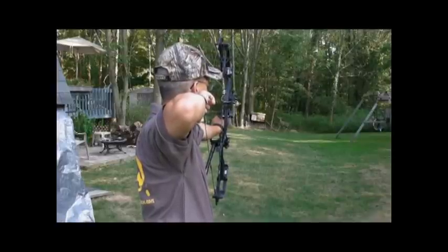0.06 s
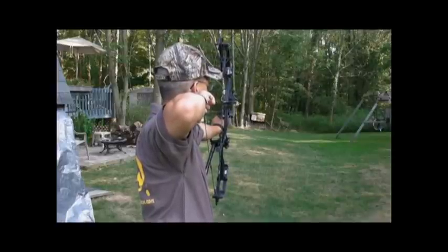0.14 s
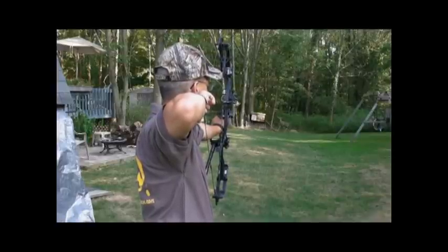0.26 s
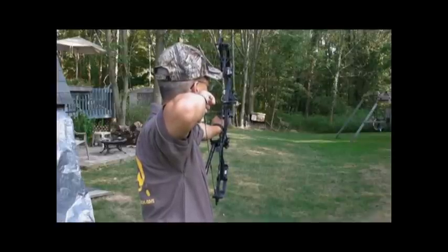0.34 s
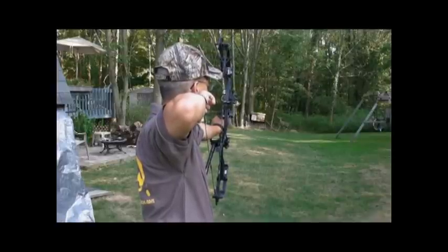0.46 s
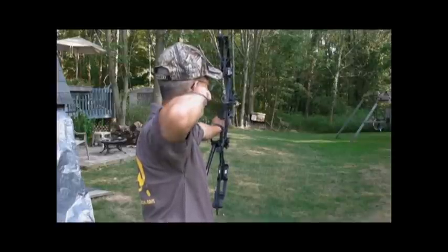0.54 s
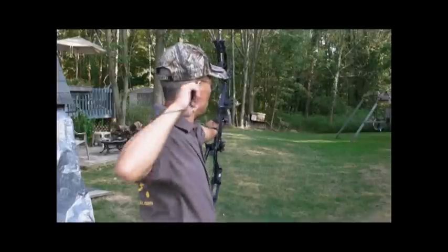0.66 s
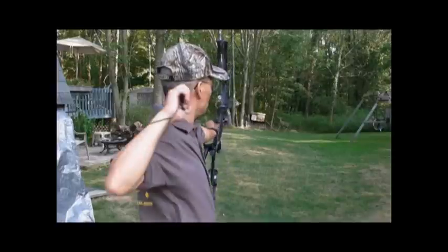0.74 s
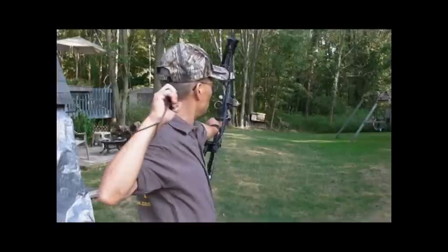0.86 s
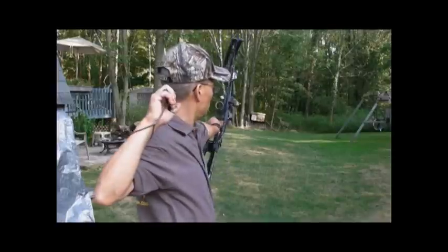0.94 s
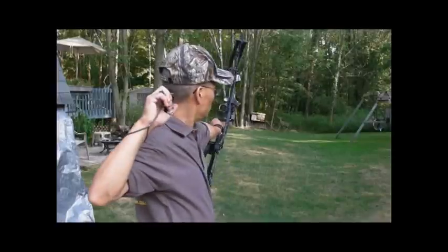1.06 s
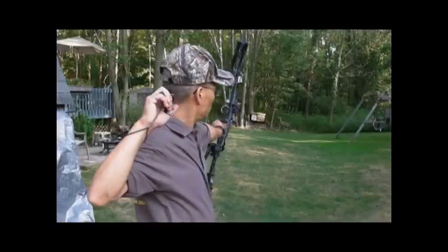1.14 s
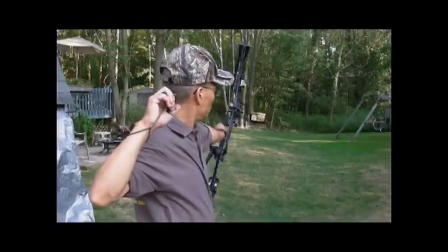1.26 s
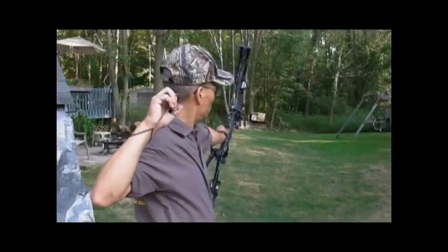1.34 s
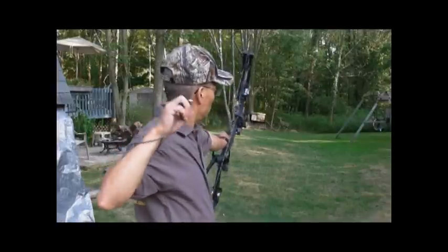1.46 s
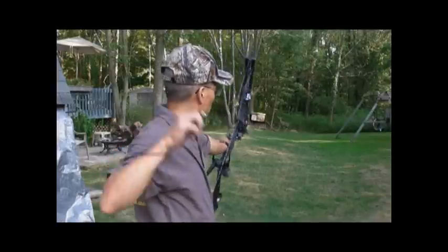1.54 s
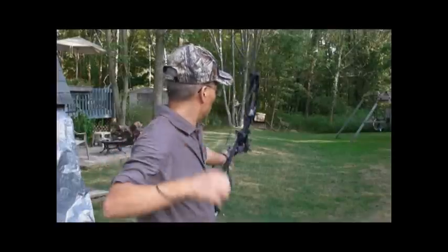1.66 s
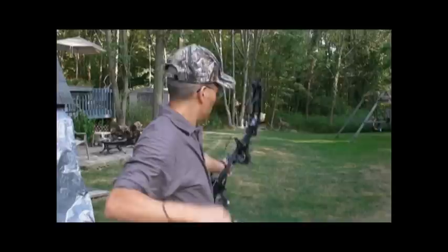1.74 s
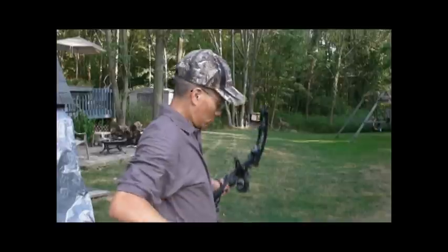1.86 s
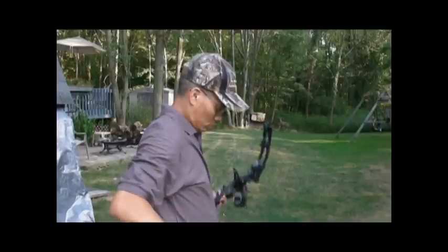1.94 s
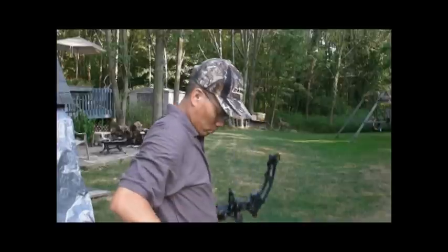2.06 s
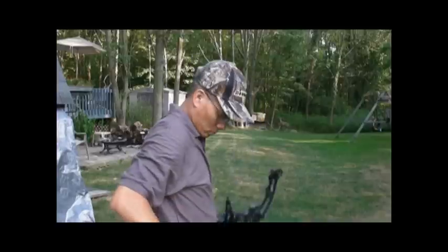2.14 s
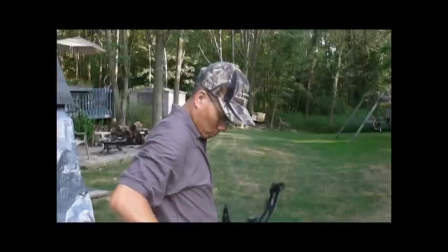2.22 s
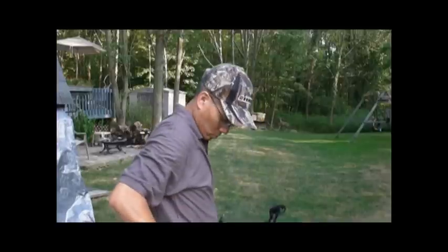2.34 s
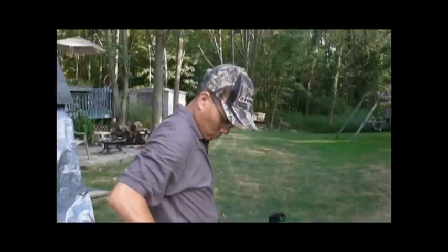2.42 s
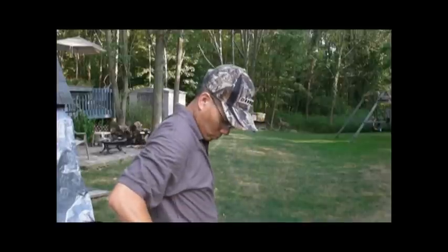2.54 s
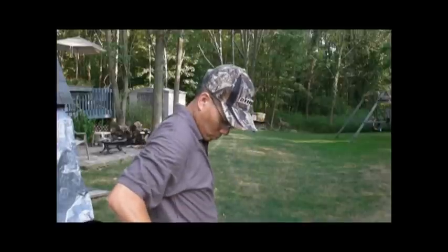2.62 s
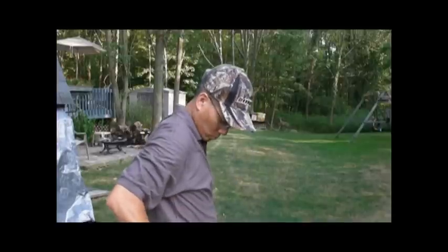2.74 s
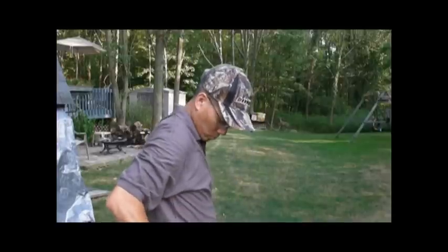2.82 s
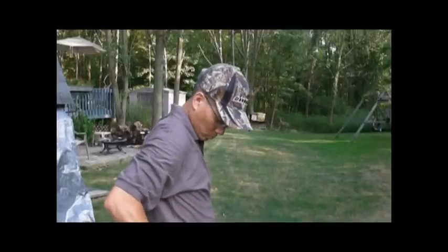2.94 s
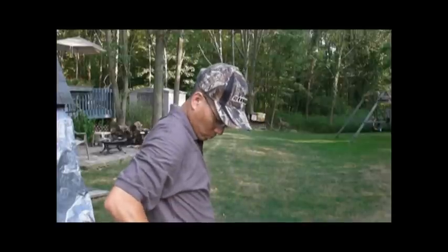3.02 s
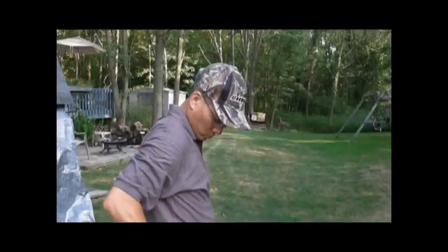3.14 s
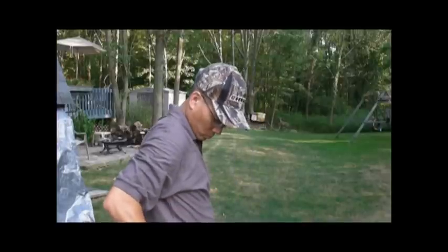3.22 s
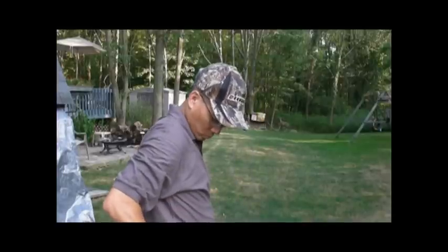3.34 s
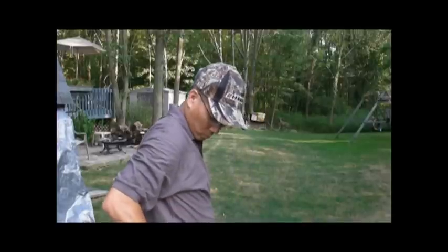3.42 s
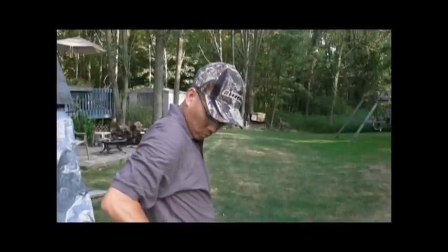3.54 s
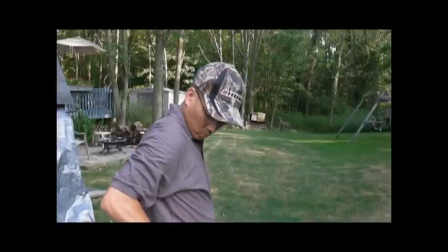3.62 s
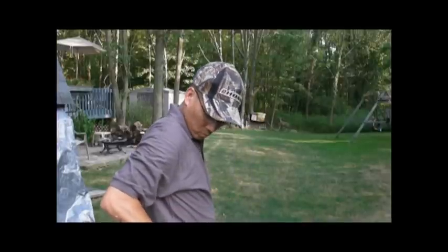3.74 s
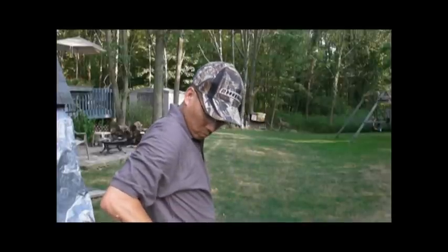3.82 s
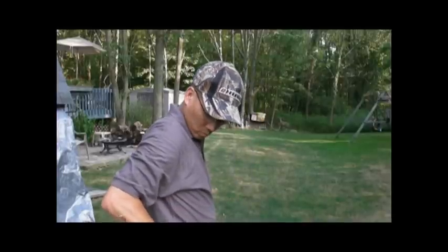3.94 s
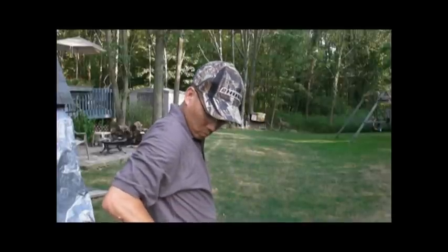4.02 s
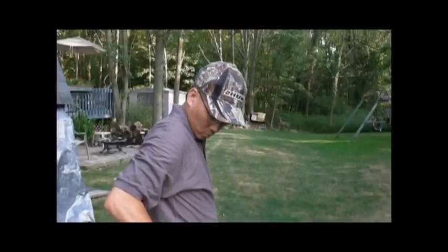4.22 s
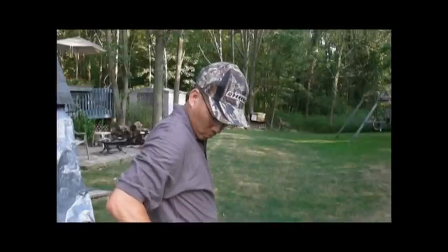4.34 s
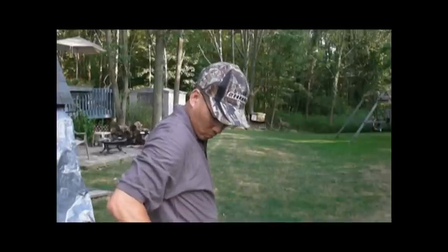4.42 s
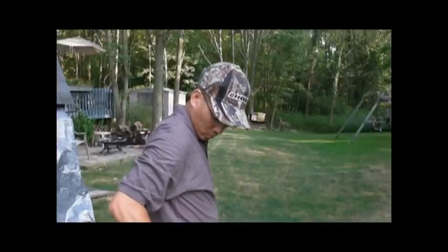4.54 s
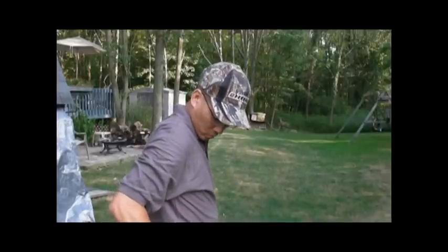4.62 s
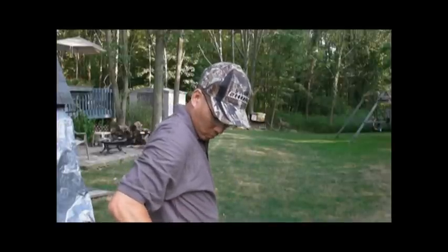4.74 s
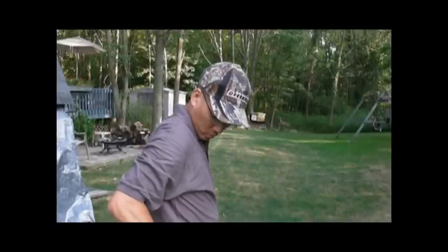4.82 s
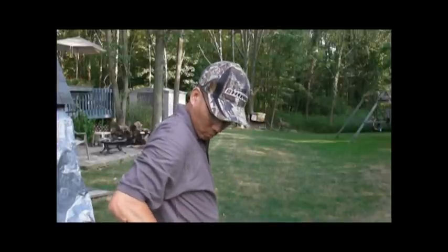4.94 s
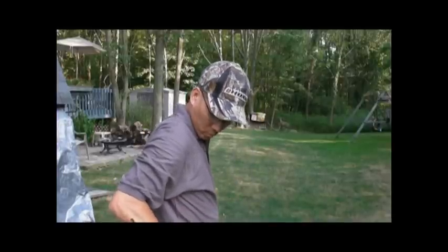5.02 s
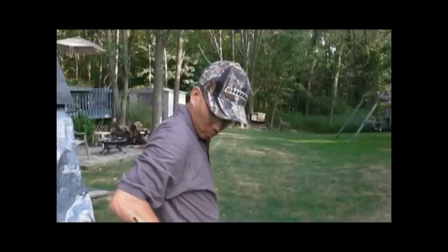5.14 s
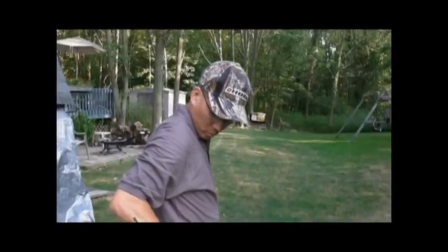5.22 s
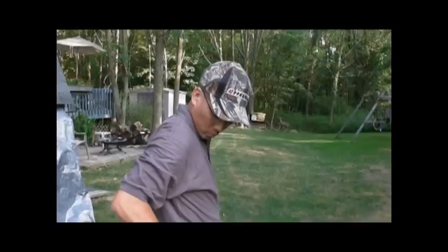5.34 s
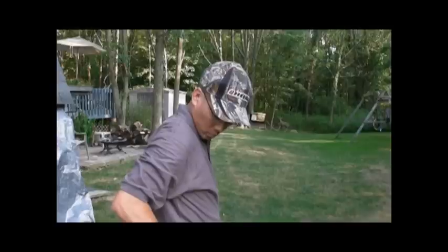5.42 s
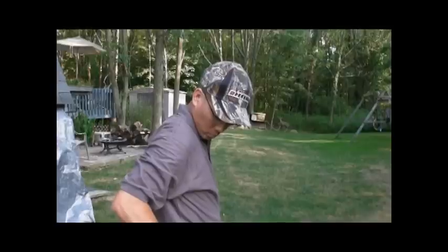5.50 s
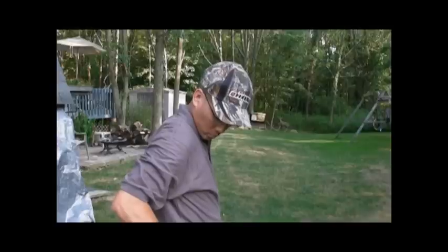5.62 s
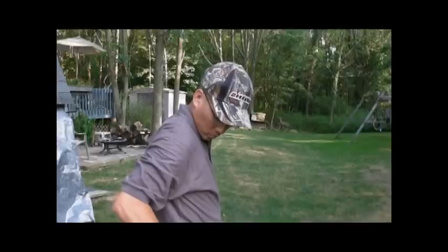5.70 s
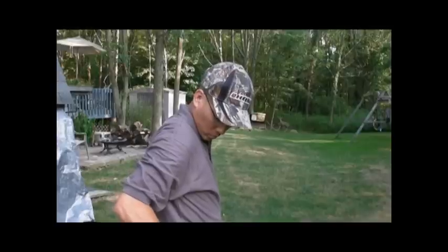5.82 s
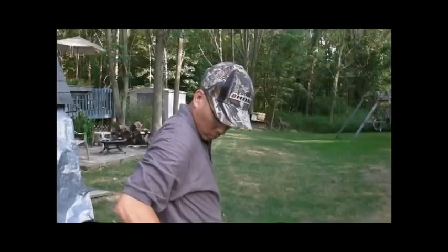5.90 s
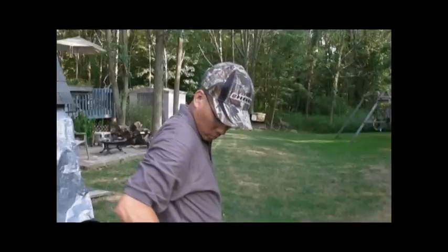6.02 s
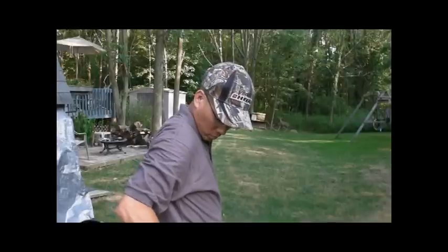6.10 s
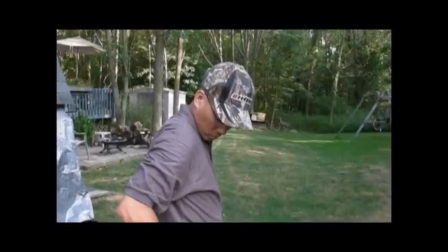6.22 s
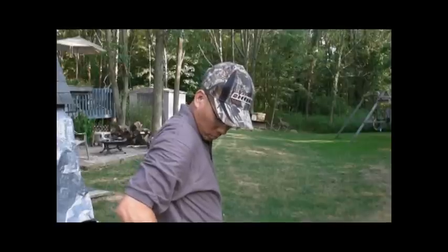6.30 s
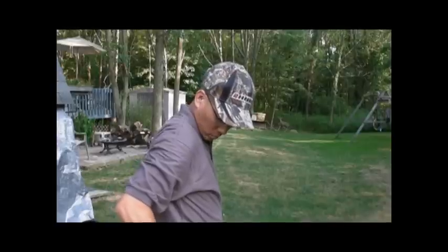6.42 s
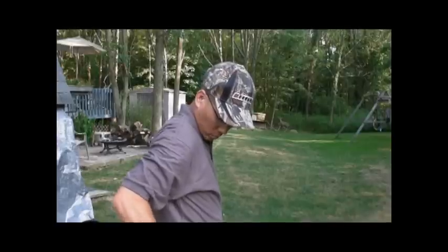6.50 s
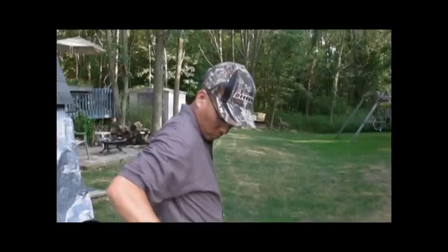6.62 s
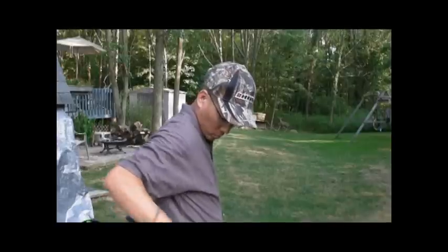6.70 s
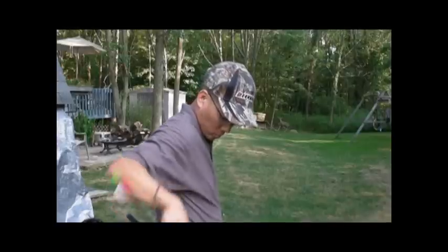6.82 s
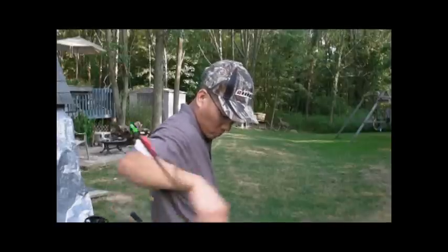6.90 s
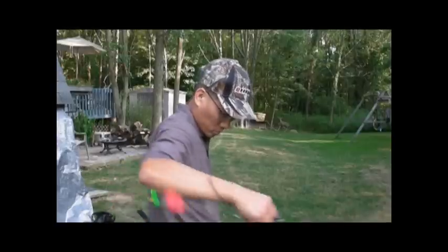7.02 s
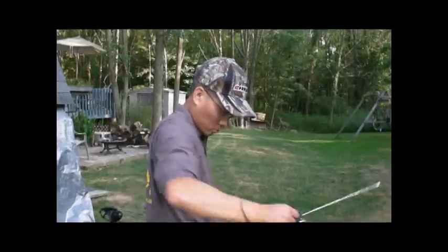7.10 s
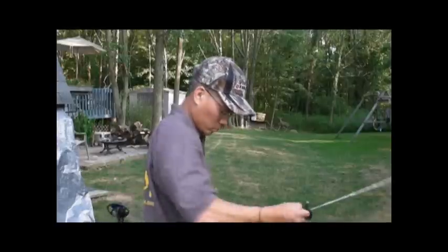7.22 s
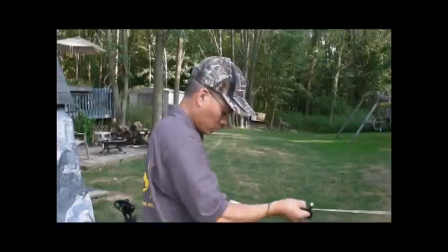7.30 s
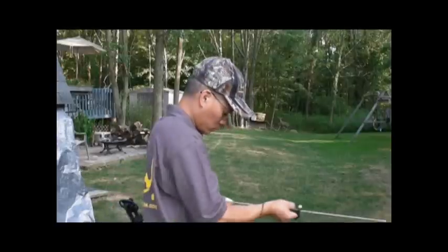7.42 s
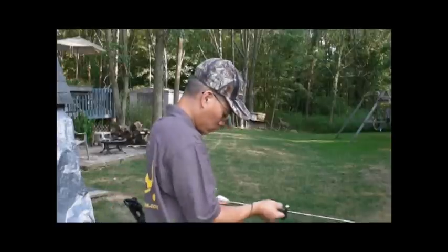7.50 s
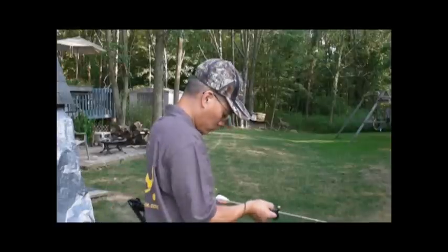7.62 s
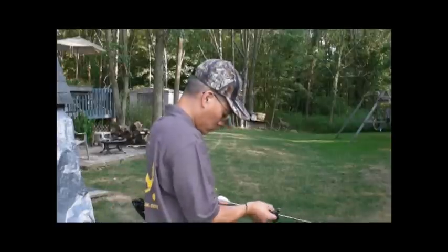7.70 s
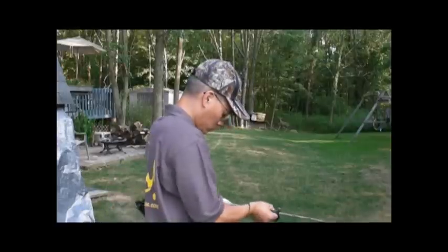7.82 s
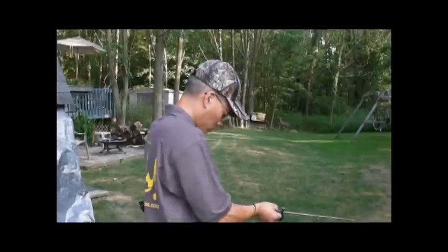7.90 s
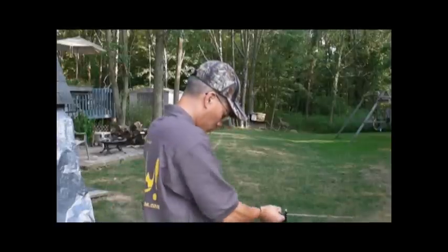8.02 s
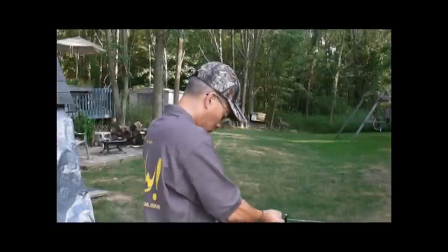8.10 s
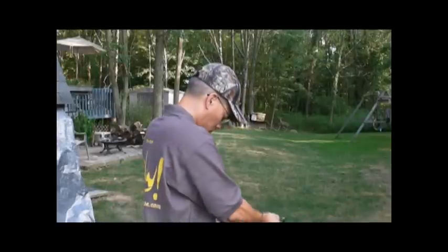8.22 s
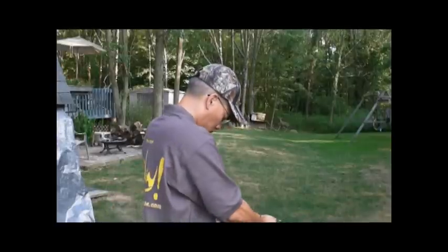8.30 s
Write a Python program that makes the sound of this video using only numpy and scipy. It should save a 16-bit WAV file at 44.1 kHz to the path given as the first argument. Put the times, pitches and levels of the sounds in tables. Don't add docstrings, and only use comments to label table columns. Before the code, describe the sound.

A compound bow looses with a loud sharp crack, its arrow thuds into a far target, then arrow shafts click and scrape in a quiver.

```python
import sys
import numpy as np
from scipy import signal
from scipy.fft import rfft, irfft, next_fast_len
from scipy.io import wavfile
from scipy.ndimage import uniform_filter1d

SR = 44100
rng = np.random.default_rng(int(sys.argv[2]) if len(sys.argv) > 2 else 0)


def amplitude_ratio(level_db):
    exponent = np.asarray(level_db, float) / 20
    return 10 ** exponent


def log_audio(samples):
    frames = np.atleast_2d(samples).T
    limited = np.clip(frames, -1, 1)
    pcm = np.round(limited * 32767).astype(np.int16)
    wavfile.write(sys.argv[1], SR, pcm)


N = 368235

# time in seconds, level in dB, contact bandwidth in Hz.
STOPS = [
    (0.5365, -4, 14000),
    (0.5381, -8, 3000),
    (0.5407, -23, 1500),
    (0.546, -23, 1500),
    (.5490, -25.5, 1500),
    (.5575, -15, 1500),
]
# frequency in Hz, time to fall 60 dB in seconds.
RATTLE_T60 = [(100, 0.18), (400, 0.43), (1500, 0.21), (5000, 0.11), (9000, 0.092), (16000, 0.14)]
# frequency in Hz, time to fall 60 dB in seconds.
TREES_T60 = [(100, 0.43), (500, 1), (2000, 0.69), (3500, 0.64), (5500, 0.74), (9000, 0.58), (16000, 0.47)]


def rms_one(x):
    return x / np.sqrt(np.mean(x ** 2) + 1e-20)


def at_hz(points, hz):
    table_hz, values = np.transpose(points)
    return np.interp(np.log(hz), np.log(table_hz), values)


def add(out, x, s):
    i = round(s * SR)
    out[..., i:i + x.shape[-1]] += x[..., :N - i]


def drift(rate):
    r = np.exp(-80 * np.pi * rate / SR)
    noise = rng.standard_normal(N // 40 + 2002)
    slow = signal.lfilter([1], [1, -2 * r, r * r], noise)[2000:]
    return np.interp(np.arange(N) / 40, np.arange(len(slow)), rms_one(slow))


def unit_click(size):
    return (np.arange(size) == 0) * 1.


def ring(clicks, hz, t60):
    r, w = amplitude_ratio(-60 / (t60 * SR)), 2 * np.pi * hz / SR
    return signal.lfilter([0, np.sin(w)], [1, -2 * r * np.cos(w), r * r], clicks + 1e-18)


def ring_modes(clicks, modes, luck_db):
    return sum(amplitude_ratio(db + k) * ring(clicks, hz, t60) for (hz, db, t60), k in zip(modes, luck_db))


def band(x, low_hz, high_hz):
    edges = [low_hz, min(high_hz, .45 * SR)]
    return signal.sosfilt(signal.butter(2, edges, "band", fs=SR, output="sos"), x)


def pair(gain_of_hz, alike, size):
    hz = np.maximum(np.arange(size // 2 + 1) * SR / size, 1)
    mid, side = rfft(rng.standard_normal((2, size)))
    alike = np.clip(alike(hz), -.99, .99)
    both = np.sqrt(1 + alike) * mid + np.sqrt(1 - alike) * side * [[1], [-1]]
    return irfft(gain_of_hz(hz) * both, size)


def white_pair(alike, size):
    return pair(np.ones_like, lambda hz: alike + 0 * hz, size)


def dying(spectrum, t60s, stretch, rise_s, alike):
    t, edges = np.arange(2 ** 15) / SR, 80 * 2 ** np.arange(0, 8, .5)
    out, power = 0, 0
    for low, high in zip(edges, edges[1:]):
        hz = np.sqrt(low * high)
        noise = band(white_pair(alike, len(t)), low, high) * amplitude_ratio(at_hz(spectrum, hz))
        power += np.mean(noise ** 2)
        out = out + noise * amplitude_ratio(-60 * t / (stretch * at_hz(t60s, hz)))
    return out / np.sqrt(power) * (1 - np.exp(-t / rise_s))


def yard():
    # frequency in Hz, density in dB per Hz.
    traffic = [(15, -59), (25, -2), (43, -20), (65, 1.5), (201, -9), (231, -6), (261, -20.5), (324, -14.5),
               (409, -6.5), (492, -14), (1000, -16.5), (1300, -23.5), (2200, -120)]
    # frequency in Hz, density in dB per Hz.
    leaves = [(590, -24), (1000, -11), (1260, -5.5), (2020, -5.5), (2530, -7.5), (3680, -7.5), (4180, -6),
              (4990, -6.5), (7010, -4), (9180, -13.5), (10900, -13.5), (15000, -6), (15900, -7.5),
              (16500, -31)]
    # centre in Hz, width in Hz, rms level in dB, throb in dB.
    drones = [(75.2, 9.1, -64, 2.5), (408.6, 9.4, -65, -3.5), (4270, 100, -64.5, 0), (5440, 650, -62, -2),
              (6990, 820, -54, -0.5)]
    # frequency in Hz, likeness from -1 to 1.
    likeness = [(60, 0.97), (130, 0.93), (290, 0.88), (640, 0.85), (1410, 0.74), (3100, 0.5), (6820, -0.28),
                (15000, -0.05)]
    alike, size = lambda hz: at_hz(likeness, hz), next_fast_len(N)
    out = 0
    for table, db in ((traffic, -52), (leaves, -50.5)):
        floor = pair(lambda hz: amplitude_ratio(at_hz(table, hz)), alike, size)[:, :N]
        out += amplitude_ratio(db + .5 * drift(6.1)) * rms_one(floor)
    for centre, width, db, throb_db in drones:
        peak = lambda hz: 1 / (1 + (2 * (hz - centre) / width) ** 2)
        out += rms_one(pair(peak, alike, size)[:, :N]) * amplitude_ratio(db + throb_db * drift(5.1))
    return out


def quiver_wall():
    # time in seconds, level in dB, share of the air column's note in dB.
    wall_hits = [
        (2.958, -43.5, 0),
        (4.183, -47, 7),
        (4.234, -48, 9),
        (4.254, -45, 9),
        (6.382, -38, -8),
        (6.675, -33, -5),
        (6.694, -41, -5),
        (6.741, -40, 5.5),
        (6.83, -49, -6),
    ]
    # frequency in Hz, level in dB, time to fall 60 dB in seconds.
    wall = [(1150, -2, 0.046), (1540, 0, .04), (1830, 0, 0.048)]
    air_hz, air_t60_s = 490, 0.036
    out, t = np.zeros((2, N)), np.arange(SR // 10) / SR
    click = unit_click(len(t))
    for s, db, air_db in wall_hits:
        note = ring_modes(click, wall, rng.normal(0, 2.6, len(wall)))
        note = note + amplitude_ratio(air_db) * ring(click, air_hz, air_t60_s)
        add(out, amplitude_ratio(db) * note * (1 - np.exp(-t / .002)), s)
    return out


def rubbing():
    # start in seconds, hold in seconds, level in dB, hiss share in dB,
    # resonance in Hz.
    brushes = [
        (3.19, 0.053, -55.5, -3, 4700),
        (3.33, 0.15, -60, -5, 4900),
        (3.51, 0.11, -54, -4, 4900),
        (4.238, .018, -51, -5, 6200),
        (4.757, 0.0037, -44, 2, 5030),
        (5.266, .06, -57, -9, 3050),
        (5.572, 0.027, -53.5, -6, 4400),
        (6.361, .022, -45.5, -14, 4000),
    ]
    # time in seconds, speed as dB, resonance of the free length in Hz,
    # share that rings from 0 to 1.
    pull = [
        (6.36, -62, 4700, .4),
        (6.42, -49.5, 5140, 0.6),
        (6.542, -47, 5770, 0.8),
        (6.616, -45, 4670, 0.9),
        (6.625, -37.5, 4840, 0.7),
        (6.698, -33, 5010, 0.3),
        (6.705, -36.5, 4880, .4),
        (6.775, -42, 4950, .5),
    ]
    rise_db_per_s, fall_db_per_s, brush_share = 600, 350, 0.43
    t = np.arange(N) / SR
    tube_gain, hiss_gain = np.zeros((2, N))
    for s, hold_s, db, hiss_db, _ in brushes:
        before_s, after_s = np.maximum(s - t, 0), np.maximum(t - s - hold_s, 0)
        gain = amplitude_ratio(db - rise_db_per_s * before_s - fall_db_per_s * after_s)
        tube_gain = tube_gain + gain
        hiss_gain = hiss_gain + amplitude_ratio(hiss_db) * gain
    s, speed_db, pull_hz, pull_share = np.transpose(pull)
    pulling = (t >= s[0]) & (t < s[-1])
    speed = uniform_filter1d(pulling * 1., size=400) * amplitude_ratio(np.interp(t, s, speed_db))
    bears_db = np.interp(t, (6.42, 6.54), (-13, 2.5))
    tube_gain = tube_gain + speed * amplitude_ratio(bears_db)
    hiss_gain = hiss_gain + speed
    brush_s, *_, brush_hz = np.transpose(brushes)
    latest_brush = np.maximum(np.searchsorted(brush_s - .03, t) - 1, 0)
    hz = np.where(pulling, np.interp(t, s, pull_hz), brush_hz[latest_brush])
    share = np.clip(np.where(pulling, np.interp(t, s, pull_share), brush_share), 0, 1)
    slip = np.minimum(rng.exponential(1, N), 4)
    clump = rng.standard_normal(N // 100 + 1).repeat(100)[:N]
    grains = rng.standard_normal((4, N)) * amplitude_ratio(2.1 * slip + 1.9 * clump)
    turn = np.exp(2j * np.pi * np.cumsum(hz) / SR)
    narrow = np.real(signal.lfilter([1], [1, -1.8, .81], grains[0] + 1j * grains[1]) * turn)
    sides = grains[2] + 0.34 * grains[3] * [[1], [-1]]
    broad = rms_one(band(band(sides, 2500, 7800), 2500, 7200))
    broad = broad + 0.17 * rms_one(band(sides, 1400, 2700))
    tube = np.sqrt(share) * rms_one(narrow) + np.sqrt(1 - share) * broad
    hiss = rms_one(band(sides, 11000, 13700))
    return amplitude_ratio(2.5) * tube_gain * tube + amplitude_ratio(-0.5) * hiss_gain * hiss


def knocks():
    # time in seconds, peak in dB, brightness in dB, time to fall 60 dB in seconds,
    # loudest ring in Hz.
    firm = [(2.7606, -29.5, -8, 0.034, 6000), (2.9565, -18.5, -11, 0.066, 5970),
            (3.5244, -28.5, -6, .0465, 5650), (4.1814, -36, -16, 0.13, 5630),
            (4.2295, -30.5, -14, 0.12, 3800), (4.2492, -17.5, -7, 0.064, 3320),
            (4.2523, -20, -20, 0.05, 5380), (4.747, -22.5, 11.5, 0.013, 6930), (4.7862, -39, -1, .04, 6270),
            (4.9133, -25, -22, 0.06, 4930), (4.9242, -24, -15, 0.025, 5200),
            (5.449, -27.5, -21, 0.041, 3430), (5.7048, -17.5, -4, 0.081, 13670),
            (5.917, -29, -13.5, 0.13, 5940), (6.3816, -23, -12.5, 0.036, 5130),
            (6.6228, -32, -9.5, 0.023, 4730), (6.6726, -12, -11.5, .045, 5940),
            (6.6894, -31, -5, .071, 4800), (6.7208, -19.5, 7.5, 0.022, 11660), (6.7296, -26, 0, .03, 3100),
            (6.7401, -20, 0, 0.058, 4850), (6.7654, -31.5, 1.1, .04, 4230)]
    # time in seconds, peak in dB, loudest ring in Hz.
    light = [(3.222, -36, 2570), (3.238, -35, 5200), (3.256, -36, 4360), (3.2793, -35.5, 4270),
             (3.2964, -37, 4660), (3.3967, -36.5, 5050), (3.5306, -29, 3800), (3.5474, -39, 3760),
             (3.567, -40, 3900), (3.59, -29, 5240), (3.645, -34.5, 6340), (3.677, -32.5, 6040),
             (4.9507, -29, 4750), (5.0512, -32, 6450), (5.1266, -34, 4420), (5.8147, -34.5, 6900),
             (6.055, -39, 7100), (6.2353, -34, 5160), (6.3628, -31, 4230), (6.4968, -33, 5680),
             (6.8303, -31.5, 5900)]
    # frequency in Hz, level in dB, time to fall 60 dB in seconds.
    shaft = [(1270, -21, 0.041), (1500, -11, 0.033), (1910, -15, 0.06), (2570, -8, 0.042),
             (3140, -9.5, 0.056), (3980, -7.5, 0.036), (4930, 4, 0.02), (6100, -3.5, 0.061),
             (7030, -3.5, 0.025), (8900, 0.5, 0.011), (9620, 2.5, 0.004), (11120, -16, .015),
             (12070, -2, 0.0078), (13200, -13, 0.0093), (15100, -5, .01)]
    tick_bright_db, tick_t60_s = -17, 0.062
    out, t = np.zeros((2, N)), np.arange(SR // 10) / SR
    click = unit_click(len(t))
    ticks = [(s, db, tick_bright_db, tick_t60_s, hz) for s, db, hz in light]
    for s, db, bright_db, t60, own_hz in sorted(list(firm) + ticks):
        body_db = -20 - 0.43 * (db + 31.5)
        t60 = np.clip(t60, .005, .2)
        fade = amplitude_ratio(-60 * t / (.3 * t60)) + .55 * amplitude_ratio(-60 * t / t60)
        mid, side = rng.standard_normal((2, len(t))) * fade
        push = .9 * click + .2 * (mid + .5 * side * [[1], [-1]])
        luck = rng.normal(0, 2.0, len(shaft))
        modes = [(hz * (1 + 0.023 * k), level, 0.16 * ring_s) for (hz, level, ring_s), k in zip(shaft, luck)]
        rings = ring_modes(push, modes, luck)
        rings = rings + amplitude_ratio(-3.5) * ring(push, own_hz, min(110 / own_hz, .017))
        sound = 0
        for low, high, gain_db in ((800, 4100, body_db + 8.5), (2500, 7600, 0), (8500, 16000, bright_db + 8.0)):
            part = band(band(rings, low, high), low, high)
            sound = sound + amplitude_ratio(gain_db) * part / np.abs(part).max()
        add(out, amplitude_ratio(db + 1.5) * sound, s)
    return out


def target():
    # frequency in Hz, level in dB, time to fall 60 dB in seconds.
    tip = [(1850, -16, 0.0035), (2950, 1, 0.0016), (5410, -17.5, 0.0026), (10750, -11.5, 0.0028)]
    # time in seconds, level in dB, start in Hz, end in Hz, time to die in seconds.
    thump = [
        (.9348, -12, 950, 90, .026),
        (1.0170, -23.5, 800, 75, .037),
    ]
    # time in seconds, level in dB, end pitch in Hz.
    trunks = [
        (.966, -35, 340),
        (1.042, -37, 250),
        (1.059, -33, 564),
        (1.093, -44, 560),
        (1.115, -40.5, 400),
        (1.157, -40.5, 465),
        (1.187, -40, 440),
    ]
    # frequency in Hz, density in dB per Hz.
    after_hit = [(59, -44), (100, -14), (350, -8.5), (1030, -7.5), (1870, -3), (3320, -4.5), (5900, -14.5),
                 (8280, -27), (14700, -20), (16000, -41)]
    pierce_s = .9283
    out, t = np.zeros((2, N)), np.arange(SR // 4) / SR
    snap = ring_modes(unit_click(len(t)), tip, np.zeros(len(tip)))
    add(out, band(snap, 760, 11400), pierce_s)
    # s, dB, start Hz, end Hz, sag s, time to die s
    thuds = [(s, db, start_hz, end_hz, .0005, dies_s) for s, db, start_hz, end_hz, dies_s in thump]
    thuds += [(row[0] + .0165, -35.5, 160, 104, .0095, 0.068) for row in thump]
    thuds += [(s, db, 620, end_hz, .0019, 0.018) for s, db, end_hz in trunks]
    for s, db, start_hz, end_hz, sag_s, dies_s in thuds:
        pitch = end_hz + (start_hz - end_hz) / (1 + t / sag_s)
        swell = amplitude_ratio(db - 60 * (t / dies_s) ** 2) * (1 - np.exp(-t / 0.00044))
        add(out, -swell * np.sin(2 * np.pi * np.cumsum(pitch) / SR), s)
    add(out, amplitude_ratio(-22.0) * dying(after_hit, RATTLE_T60, 0.46, 0.00136, 0.91), pierce_s)
    add(out, amplitude_ratio(-32.5) * dying(after_hit, TREES_T60, 0.92, 0.0079, 0.74), pierce_s)
    return out


def string_stroke():
    # time in seconds, level in dB.
    stroke = [
        (.508, -81),
        (.516, -36),
        (.530, -27.5),
        (0.5382, -23),
        (0.538, -77),
    ]
    whistle_hz, whistle_db, start_s, stop_s = 3915, -12, .5332, .5366
    out, t = np.zeros((2, N)), np.arange(SR) / SR
    s, db = np.transpose(stroke)
    rush = rms_one(band(white_pair(1.1, SR), 290, 16000))
    add(out, rush * amplitude_ratio(np.interp(t, s, db, left=-200, right=-200)), 0)
    grow = np.clip((t - start_s) / (stop_s - start_s), 0, 1)
    fade = amplitude_ratio(-60 * np.maximum(t - stop_s, 0) / .004)
    add(out, amplitude_ratio(whistle_db) * grow * fade * np.sin(2 * np.pi * whistle_hz * t), 0)
    return out


def bow_stops():
    # frequency in Hz, level in dB, time to fall 60 dB in seconds.
    limbs = [(150, -30, 0.03), (531, -38, 0.034), (1230, -26.5, 0.021), (1825, -29, 0.035),
             (2400, -28.5, .02), (3540, -26, 0.055), (5600, -20, 0.013), (10700, -17.5, .006),
             (15200, -13.5, 0.0059)]
    # frequency in Hz, level in dB, time to fall 60 dB in seconds.
    swing = [(248, -19.5, 0.12), (411, -16, 0.062), (698, -21.5, 0.083), (771, -24.5, 0.13)]
    out, t = np.zeros((2, N)), np.arange(SR) / SR
    for s, db, contact_hz in STOPS:
        contact = signal.butter(2, contact_hz, fs=SR, output="sos")
        click = signal.sosfilt(contact, unit_click(SR // 3))
        click = amplitude_ratio(db) * click / click.max()
        push = click / click.sum() * click.max()
        body = ring_modes(push, limbs, rng.normal(0, 3, len(limbs)))
        add(out, band(click * 0.7 + 2.6 * body, 165, 17000), s)
    swinging = ring_modes(unit_click(SR), swing, np.zeros(len(swing)))
    add(out, swinging * (1 - np.exp(-t / 0.0018)), STOPS[1][0])
    add(out, amplitude_ratio(-3) * ring(unit_click(400), 9000, .0009), STOPS[0][0])
    return out


def bow_shudder():
    # frequency in Hz, density in dB per Hz.
    rattle = [(59, -35), (100, -20), (229, -16), (547, -8), (721, -12), (1360, -9.5), (3470, -2),
              (8640, -15), (11600, -5.5), (16000, -7)]
    # frequency in Hz, density in dB per Hz.
    echo = [(59, -43), (100, -16.5), (266, -13), (315, -8), (662, -13), (930, -15), (1310, -12), (2990, -2),
            (5530, -3), (7610, -14), (16000, 2.5)]
    out, t = np.zeros((2, N)), np.arange(SR) / SR
    buzz = rms_one(band(white_pair(0.44, SR), 4600, 6060))
    add(out, buzz * (amplitude_ratio(-24.5 - 60 * t / 0.18) + amplitude_ratio(-41.5 - 60 * t / 0.93)), STOPS[1][0])
    add(out, amplitude_ratio(-17.0) * dying(rattle, RATTLE_T60, 0.98, 0.00077, 0.9), STOPS[0][0])
    add(out, amplitude_ratio(-34.0) * dying(echo, TREES_T60, 1, 0.0126, 0.51), STOPS[0][0])
    return out


def scene():
    bow = string_stroke() + bow_stops() + bow_shudder()
    return yard() + quiver_wall() + rubbing() + knocks() + target() + bow


def smear(x):
    # frequency in Hz, level in dB.
    noise_db = [(300, -22), (1500, -12), (4000, -10), (10000, -8), (16000, -8)]
    frame, frame_start = 1024, 734
    lead = frame - frame_start
    padded = np.pad(x, ((0, 0), (lead, 2 * frame)))
    window = np.sin(np.pi * (np.arange(2 * frame) + .5) / (2 * frame))
    hz, _, frames = signal.stft(padded, SR, window, 2 * frame, frame)
    power = uniform_filter1d(np.abs(frames) ** 2, size=56, axis=1)
    turn = np.exp(2j * np.pi * rng.random(frames.shape))
    noise = np.sqrt(np.abs(power)) * turn * amplitude_ratio(at_hz(noise_db, hz + 1))[:, None]
    return x + signal.istft(noise, SR, window, 2 * frame, frame)[1][:, lead:][:, :N]


def band_limit(x):
    return signal.sosfilt(signal.butter(12, 16820, fs=SR, output="sos"), x)


def record(dry):
    dry = signal.sosfilt(signal.butter(2, 45, "high", fs=SR, output="sos"), dry)
    loud = np.clip(smear(dry), -1.1, 1.1)
    cut = signal.sosfilt(signal.cheby2(16, 40, 16100, fs=SR, output="sos"), loud)
    return band_limit(np.clip(cut, -1, 1))


dry = scene()
out = record(dry)
log_audio(out)
```